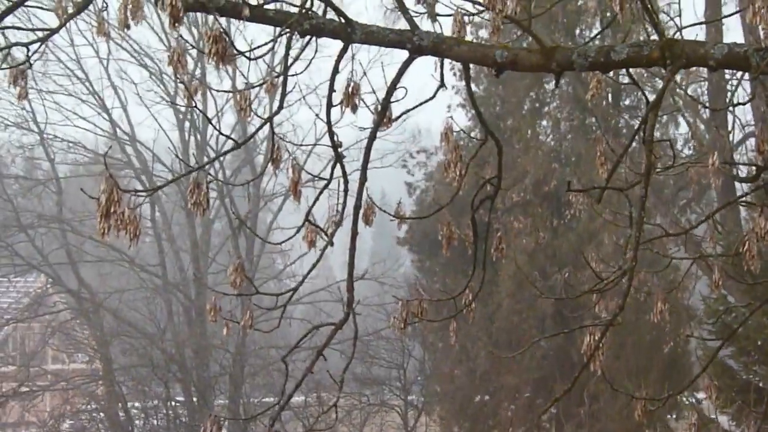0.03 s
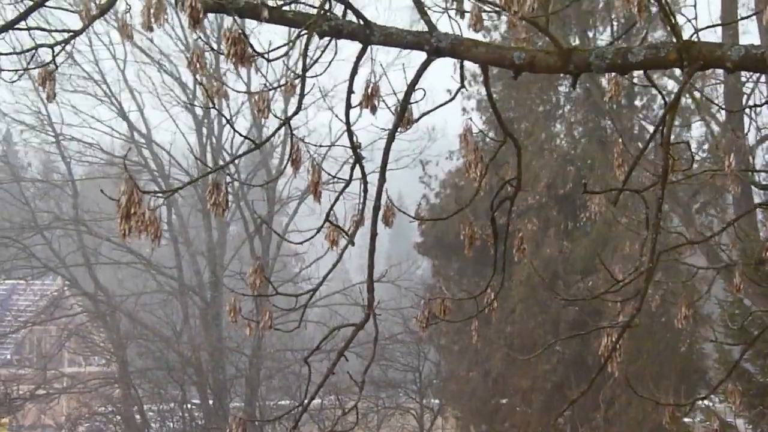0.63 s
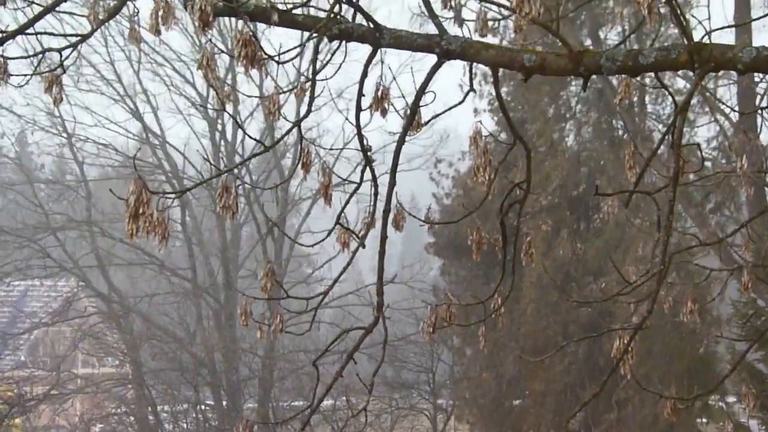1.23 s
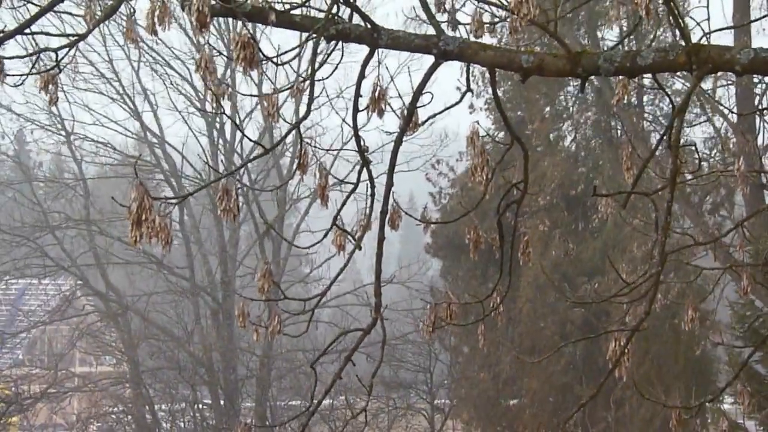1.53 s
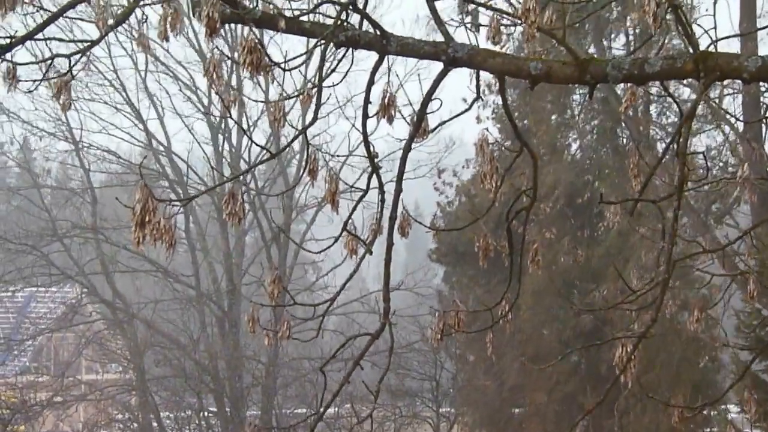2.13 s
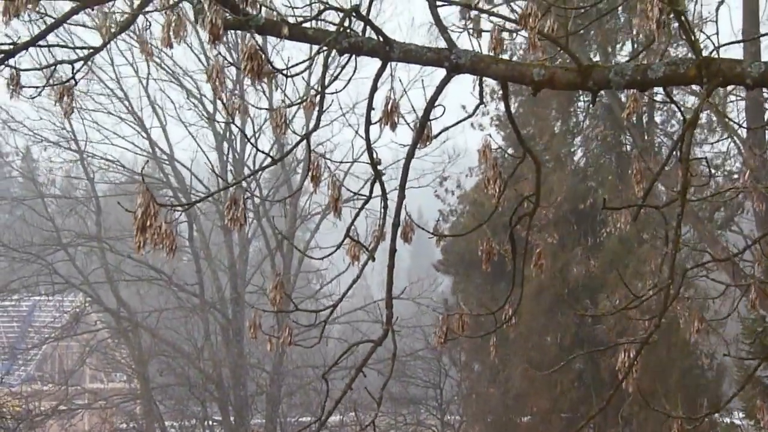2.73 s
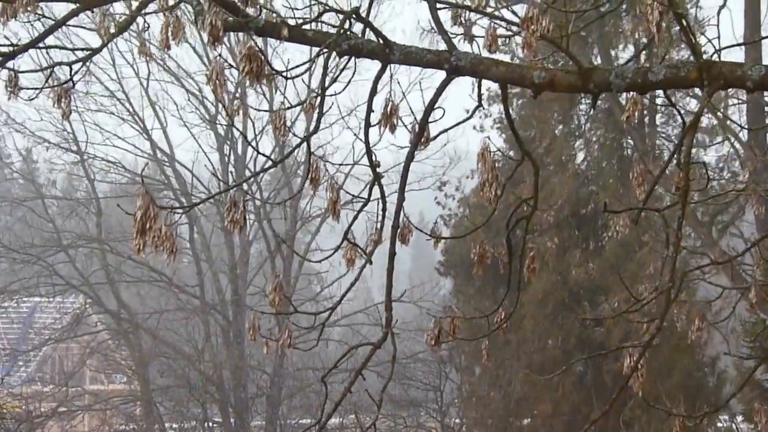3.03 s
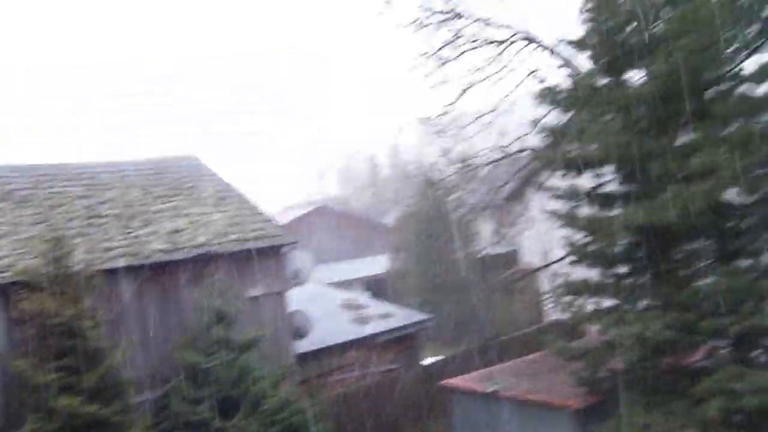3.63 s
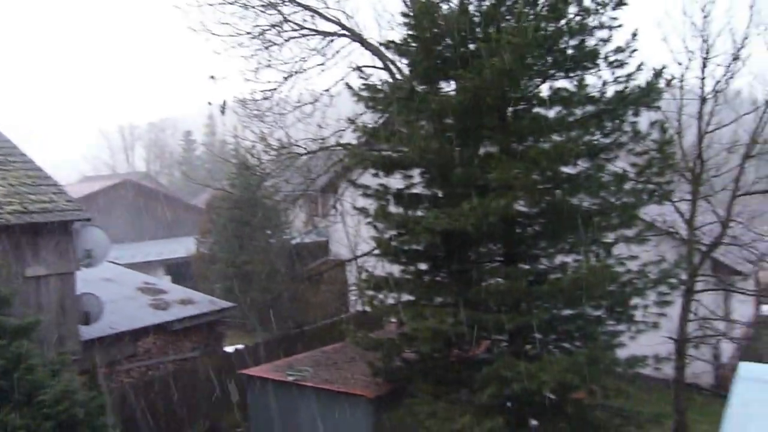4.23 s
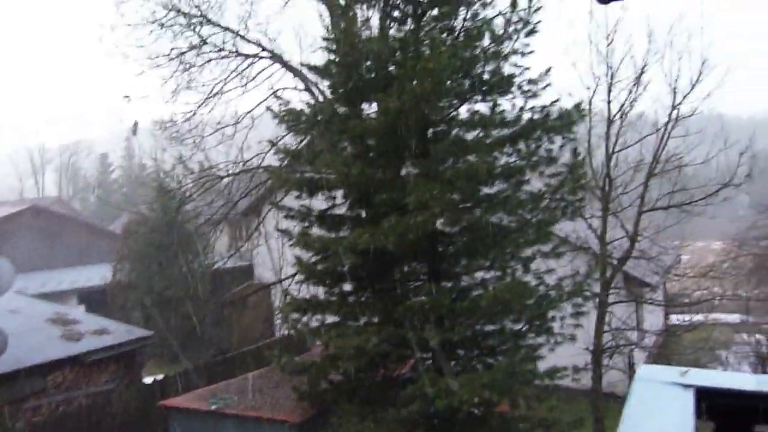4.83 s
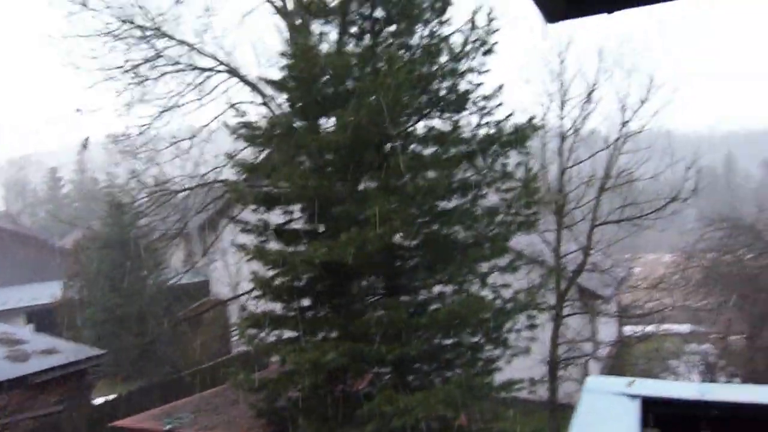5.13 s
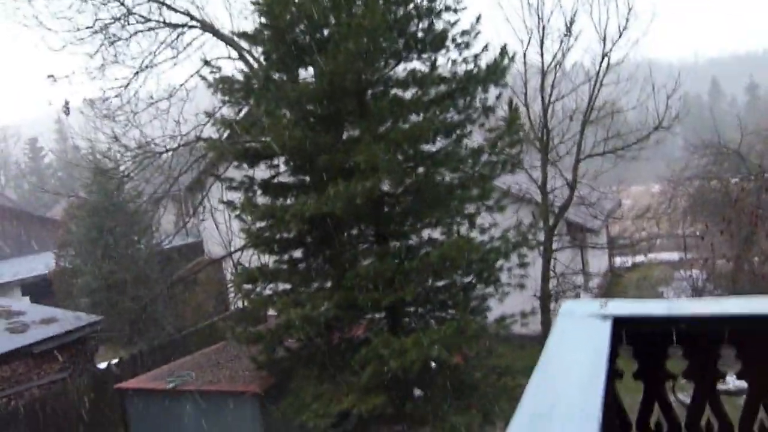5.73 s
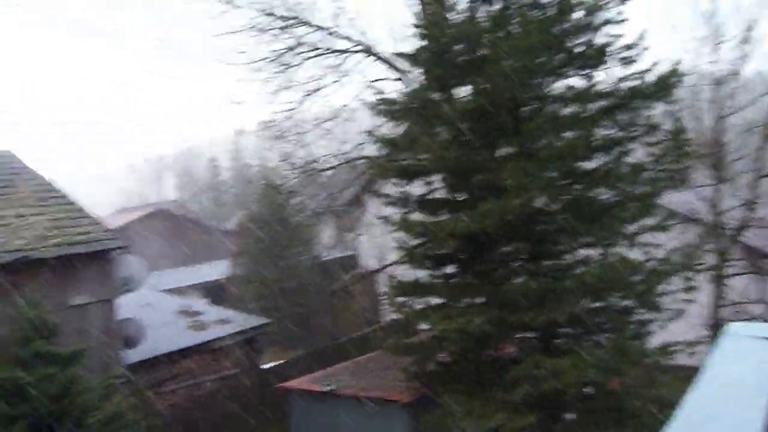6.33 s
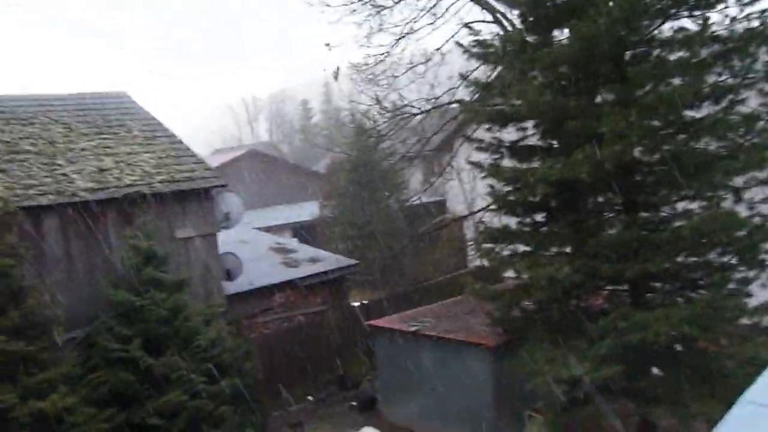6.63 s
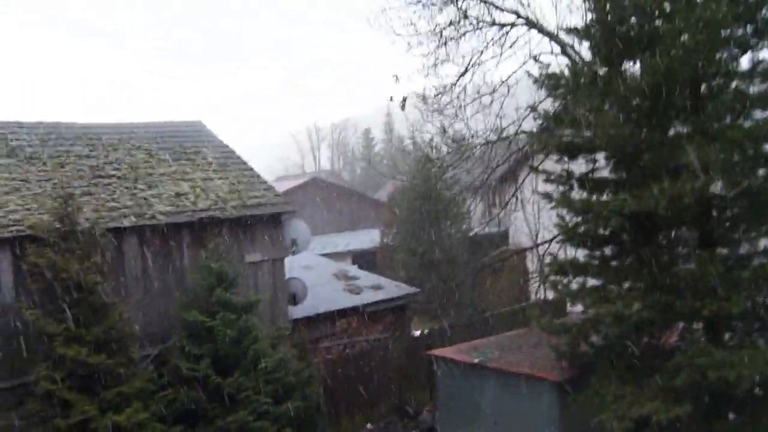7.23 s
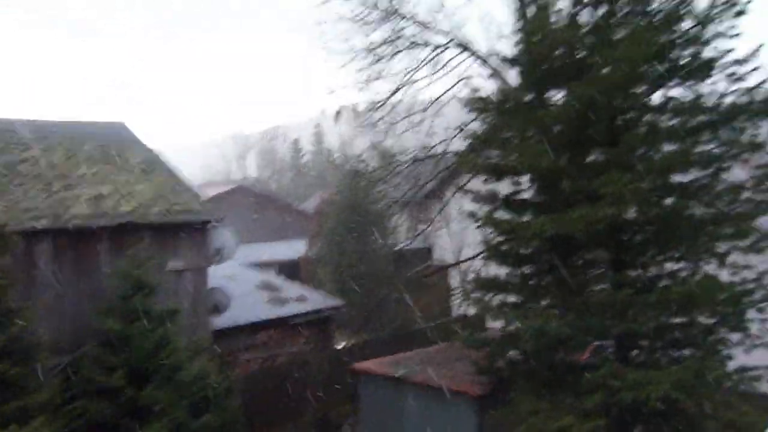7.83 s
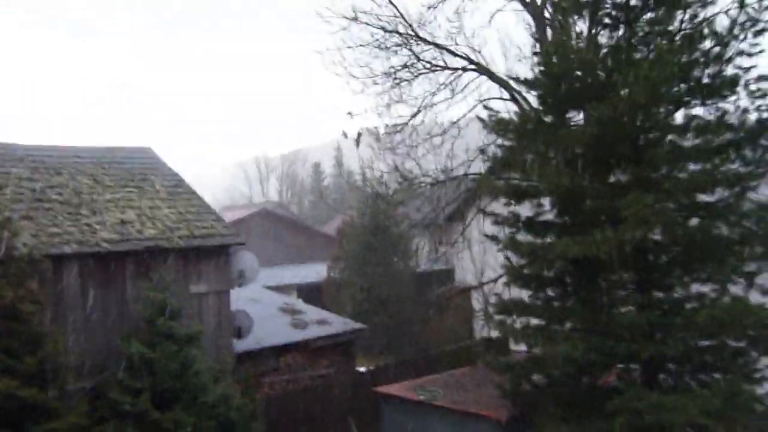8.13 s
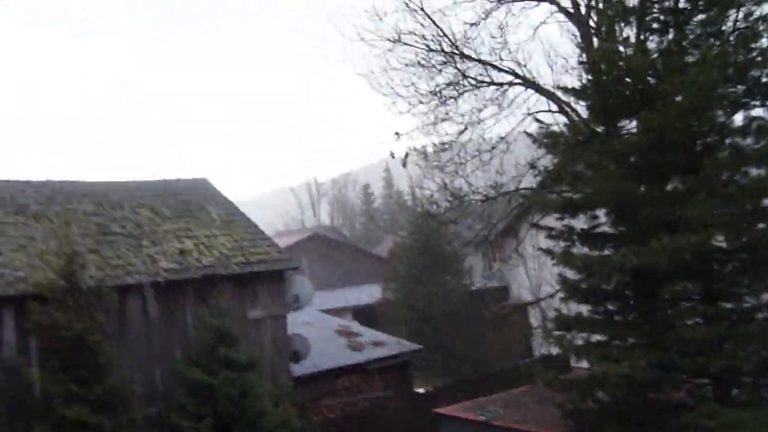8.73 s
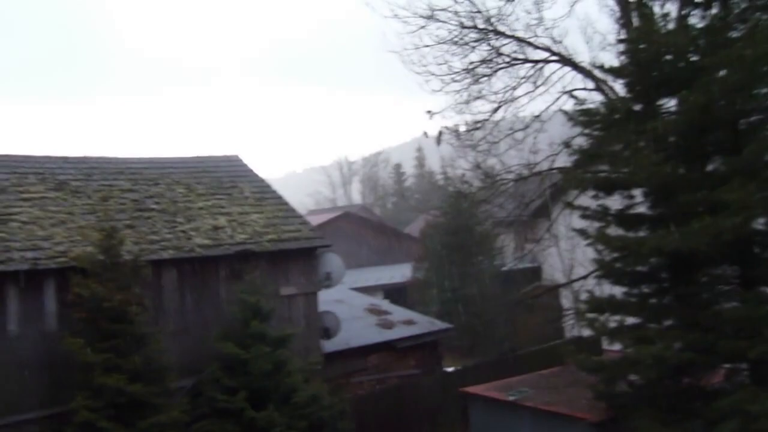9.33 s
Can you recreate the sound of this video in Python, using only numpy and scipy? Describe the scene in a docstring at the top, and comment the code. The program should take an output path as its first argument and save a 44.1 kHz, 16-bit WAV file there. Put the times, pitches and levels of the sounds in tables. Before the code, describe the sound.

In quiet outdoor air, short puffs of wind boom and hiss across the microphone, with faint rustles and a few thin, distant squeaks. Then hail starts abruptly: a steady roar on far roofs and trees under a grainy hiss. Close pellets snap on the boards of a wooden balcony, the railing takes one hard knock and later a soft one, and wind rumbles on the microphone.

```python
"""Wind puffs across the microphone in quiet air, with faint rustles and squeaks; then, abruptly, hail pours.
A winter squall over a village garden, heard from a wooden balcony. Each gust booms low and hisses over an
edge. Fine hail on far roofs and trees merges to a roar under a grainy hiss, and wind rumbles on the
microphone. Near pellets snap on the boards and echo off the walls; the railing rings to a hard knock and
later to a soft one."""
import sys
import numpy as np
from scipy import signal
from scipy.fft import rfft, irfft, next_fast_len
from scipy.io import wavfile
from scipy.ndimage import uniform_filter1d, map_coordinates

SR = 44100
rng = np.random.default_rng(int(sys.argv[2]) if len(sys.argv) > 2 else 0)


def materialize(psi):
    """Save the field psi as 16-bit PCM at rate SR to the path in sys.argv[1].

    A 1-D psi becomes a single channel; in a 2-D psi each row is a channel.
    """
    bounded = np.clip(np.atleast_2d(psi).T, -1, 1)
    quanta = np.round(bounded * 32767).astype(np.int16)
    wavfile.write(sys.argv[1], SR, quanta)


N = 422919
HAIL_START_S = 3.1195

# the squall builds, peaks and eases: t/s, far roar/dB, pellet hiss/dB, spray on the balcony/dB
SQUALL_LEVELS = [(3.12, -39.5, -35, -74), (3.8, -38, -31.5, -53), (4.45, -39, -32, -44.5),
                 (4.8, -39, -32, -37), (5.25, -39, -33.5, -42.5), (5.65, -39.5, -33.5, -46.5),
                 (6.1, -40.5, -35, -41.5), (6.4, -39, -34.5, -42), (6.8, -40.5, -36, -47.5),
                 (7.35, -40.5, -37, -51.5), (7.85, -40.5, -36, -51), (8.35, -40, -39, -58),
                 (8.65, -41, -36.5, -48), (9.0, -39.5, -38, -59), (9.59, -40.5, -36, -59)]
# stereo image of the air and gusts: f/Hz, left-right coherence (1 is mono)
AIR_COHERENCE = [(100, 1), (310, 1), (700, 0.85), (1400, 0.42), (2400, 0.11), (4000, 0.17), (8000, 0.52)]
# stereo image of the hail: f/Hz, left-right coherence
HAIL_COHERENCE = [(50, .35), (110, 1), (180, 1), (380, 0.99), (700, 0.95), (1300, 0.7), (2400, 0.17),
                  (4400, 0.29), (8000, 0.62)]


def amp(db):
    """Decibels to gain."""
    return 10 ** (np.asarray(db) / 20)


def unit(x):
    """Scale to rms 1."""
    return x / np.sqrt(np.mean(x ** 2) + 1e-20)


def along(points, hz):
    """Read a curve of (f/Hz, value) points on a log frequency axis."""
    f, v = np.transpose(points)
    return np.interp(np.log(hz + 1), np.log(f + 1), v)


def curves(rows):
    """One value per sample for each column after the time."""
    times, *columns = np.transpose(rows)
    return [np.interp(np.arange(N) / SR, times, column) for column in columns]


def wobble(rate, count=N):
    """A smooth random curve, rate knots a second."""
    knots = rng.standard_normal(int(count * rate / SR) + 4)
    return map_coordinates(knots, [np.arange(count) * rate / SR])


def swell(start, rise, hold, fall_db_per_s):
    """An envelope with a smooth rise, a hold and up to a second of steady fall."""
    age = np.arange(N) / SR - start
    attack = np.sin(np.pi / 2 * np.clip(age / rise, 0, 1)) ** 2
    return attack * amp(-fall_db_per_s * np.clip(age - rise - hold, 0, 1))


def power_sum(levels):
    """Unrelated sounds add in power."""
    return np.sqrt(sum(level ** 2 for level in levels))


def filtered(x, response):
    """Equalise x with a gain given as a function of frequency."""
    n = x.shape[-1]
    padded = next_fast_len(n + 4096)
    return irfft(rfft(x, padded) * response(np.fft.rfftfreq(padded, 1 / SR)), padded)[..., :n]


def resonances(hz, peaks):
    """Gain of peaks (f/Hz, width/Hz, level/dB) over a flat response."""
    return amp(sum(db / (1 + (2 * (hz - centre) / width) ** 2) for centre, width, db in peaks))


def spread(pair, spectrum, coherence):
    """Colour two unrelated signals with a spectrum (f/Hz, level/dB) and blend them to stereo of rms 1."""
    def mid_side_gains(hz):
        angle = np.arccos(np.clip(along(coherence, hz), -1, 1)) / 2
        return amp(along(spectrum, hz)) * [np.cos(angle), np.sin(angle)]
    mid, side = filtered(pair, mid_side_gains)
    return unit(np.array([mid + side, mid - side]))


def add(track, start, sound):
    """Mix a sound into a track from start seconds on."""
    part = track[..., max(round(start * SR), 0):][..., :sound.shape[-1]]
    part += sound[..., :part.shape[-1]]


def eddies(patchy_db):
    """Two noises whose gain drifts in random patches of time and frequency."""
    bins = signal.stft(rng.standard_normal((2, N)), nperseg=512)[2]
    patches = uniform_filter1d(rng.standard_normal(bins.shape[1:]), size=5, axis=0)
    patches = unit(uniform_filter1d(patches, size=12, axis=1))
    return unit(signal.istft(bins * amp(patchy_db * patches), nperseg=512)[1][:, :N])


def grains(rate, size_db, pitch_hz, cycles, count=30000):
    """Tiny impacts, rate a second, each a damped ring of its own size, pitch and direction."""
    when, where = rng.random((2, count))
    size, pitch = rng.standard_normal((2, count))
    samples = np.arange(64)
    turns = (pitch_hz * np.exp(.35 * pitch))[:, None] * samples / SR
    lands = np.arange(count) < rate * N / SR
    strength = lands * amp(size_db * np.clip(size, -3, 2.6))
    rings = strength[:, None] * np.sin(2 * np.pi * turns) * np.exp(-turns / cycles)
    slots = ((when * N).astype(int)[:, None] + samples).ravel()
    pans = np.cos(2 * np.pi * where), np.sin(2 * np.pi * where)
    return unit(np.array([np.bincount(slots, (rings * pan[:, None]).ravel(), N)[:N] for pan in pans]))


def ping(t, hz, length, phase):
    """A few cycles that swell and die around t = 0."""
    return np.exp(-(t / length) ** 2) * np.sin(2 * np.pi * (hz * t + phase))


def calm():
    """A bed of quiet outdoor air, a faint hiss dying away and brief rustles, each at its own pitch."""
    # tone of the still air and of the rustling: f/Hz, level/dB
    air_spectrum = [(25, -27), (60, -26), (95, -4.5), (120, -8), (155, -3), (183, 0), (212, -5.5),
                    (250, -3.5), (277, 1.5), (305, -5.5), (400, -6), (520, -9.5), (900, -13), (1310, -15),
                    (1360, -19), (1420, -16.5), (2400, -20), (3400, -18), (5000, -23.5), (7700, -30)]
    rustle_spectrum = [(500, -18), (1700, 2), (3500, -1), (5200, -7), (6500, -6.5), (7700, -25)]
    # rustle cues: t/s, level/dB, f/Hz
    rustles = [(0.885, -57.5, 5000), (1.18, -64, 5500), (2.24, -51.5, 4830), (2.41, -59.5, 5400),
               (2.64, -61, 6400), (2.785, -65, 2500), (2.865, -63.5, 5850), (2.98, -66, 5000)]
    out = amp(-55) * spread(eddies(patchy_db=0.9), air_spectrum, AIR_COHERENCE)
    fade = amp(-54.5 - 23 * np.arange(N) / SR)
    out += fade * spread(eddies(patchy_db=3.7), rustle_spectrum, AIR_COHERENCE)
    n, width_hz, peak_db = SR // 2, 2000, 11.5
    for start, db, hz in rustles:
        scuff = filtered(rng.standard_normal((2, n)), lambda f: resonances(f, [(hz, width_hz, peak_db)]))
        level = amp(db) * swell(0, rise=0.015, hold=0.013, fall_db_per_s=107)[:n]
        add(out, start, level * spread(scuff, rustle_spectrum, AIR_COHERENCE))
    return out


def squeaks():
    """A few thin, rough, wavering tones, faint and far off."""
    # squeak cues: t/s, f/Hz, level/dB, hold/s
    cues = [(2.589, 1680, -62.5, .028), (2.583, 2370, -66, .055), (2.65, 3330, -64, .04),
            (2.655, 4400, -68, .015), (2.698, 2150, -63, .03), (2.702, 1310, -62, .025),
            (2.76, 1294, -61.5, .025), (2.803, 2070, -70, 0.054)]
    waver, rough_db = .027, 3.5
    out, n = np.zeros(N), SR // 3
    for start, hz, db, hold in cues:
        phase = 2 * np.pi * np.cumsum(hz * (1 + waver * wobble(195, n))) / SR
        envelope = swell(0, rise=0.013, hold=hold, fall_db_per_s=380)[:n]
        add(out, start, amp(db + rough_db * wobble(123, n)) * envelope * np.sin(phase))
    return out


def gusts():
    """Each puff booms, rushes and hisses over an edge, higher as it gathers speed; the boom lasts longest."""
    # puffs of wind: t/s, rise/s, hold/s, boom/dB, rush/dB, hiss/dB, boom pitch/Hz,
    # edge tone at the start/Hz, edge tone at full strength/Hz, edge tone against the hiss/dB
    puffs = [(0.045, 0.089, 0.025, -42.5, -39.5, -37, 153, 2590, 4650, -8.5),
             (0.17, 0.0303, 0.083, -45, -42, -55, 153, 1500, 2000, 3),
             (0.726, 0.017, .02, -61, -57, -78, 130, 4200, 4200, -8),
             (1.071, 0.02, 0.021, -50, -51.5, -53, 190, 1440, 1597, 5),
             (1.742, 0.024, 0.04, -52, -50, -57, 200, 1530, 1820, -2),
             (1.937, 0.022, 0.15, -47, -53.5, -58.5, 191, 4000, 5020, -11),
             (2.069, 0.034, 0.043, -46, -50, -54, 181, 2410, 3160, -12),
             (2.187, 0.018, 0.089, -40.5, -43, -54.5, 190, 3490, 5340, -9),
             (2.313, 0.046, 0.059, -44, -44.5, -59, 204, 4500, 5450, -11)]
    # tone of the hollow boom, the midrange rush and the airy hiss: f/Hz, level/dB
    boom_spectrum = [(30, -46), (55, -38), (85, -13), (130, -1), (190, -2.5), (250, -2.5), (330, -10),
                     (500, -29), (1000, -68)]
    rush_spectrum = [(200, -26), (360, -5), (450, 2), (620, -3.5), (770, -8), (1000, -8), (1250, -7.5),
                     (1500, -11.5), (1750, -8), (2050, -20), (3300, -25), (7000, -29.5)]
    hiss_spectrum = [(1000, -8), (1750, 1.5), (2500, 4), (3500, -3), (4400, -1), (5400, -6), (6400, -8),
                     (7700, -18)]
    # narrow resonances that colour every gust: f/Hz, width/Hz, level/dB
    cavities = [(190, 34, 6.5), (273, 30, 1.5), (385, 30, -1), (474, 30, 1), (488, 25, 0), (585, 46, 6),
                (954, 35, 5.5), (1160, 75, 5), (1390, 33, 8.5), (1675, 44, 5), (3150, 59, 5)]
    boom_root_hz, edge_width_hz, hiss_lag_s, flutter_db = 190, 780, 0.0059, 0.9
    out, t = np.zeros((2, N)), np.arange(SR) / SR
    rush_levels = []
    for start, rise, hold, boom_db, rush_db, hiss_db, boom_hz, first_hz, full_hz, edge_db in puffs:
        transposed = [(f * boom_hz / boom_root_hz, db) for f, db in boom_spectrum]
        boom = spread(rng.standard_normal((2, SR)), transposed, AIR_COHERENCE)
        glide_hz = np.interp(t, [0, rise + hold], [first_hz, full_hz])
        band = filtered(rng.standard_normal((2, SR)), lambda f: 1 / (1 + (2 * f / edge_width_hz) ** 2))
        edge = unit(band * np.sin(2 * np.pi * np.cumsum(glide_hz) / SR))
        air = spread(rng.standard_normal((2, SR)), hiss_spectrum, AIR_COHERENCE)
        hiss = unit(air + amp(edge_db) * edge)
        boom_level = amp(boom_db) * swell(0, rise, hold, fall_db_per_s=69)[:SR]
        hiss_level = amp(hiss_db) * swell(hiss_lag_s, rise, hold, fall_db_per_s=121)[:SR]
        add(out, start, boom_level * boom + hiss_level * hiss)
        rush_levels.append(amp(rush_db) * swell(start, rise, hold, fall_db_per_s=112))
    out += power_sum(rush_levels) * spread(eddies(patchy_db=0.58), rush_spectrum, AIR_COHERENCE)
    return amp(flutter_db * wobble(90) - 2.5) * filtered(out, lambda hz: resonances(hz, cavities))


def thumps():
    """A lump of air hits the microphone housing, which answers with a few low cycles."""
    # soft wind thumps: t/s, level/dB, f/Hz, rise/s
    cues = [(0.117, -26.5, 154, 0.011), (0.142, -29.5, 199, 0.008), (0.159, -34, 195, 0.022),
            (1.094, -48.5, 370, 0.016), (1.1, -44.5, 192, 0.025), (1.8, -44, 220, 0.014),
            (2.098, -35.5, 197, 0.016), (5.944, -38, 197, .012), (6.128, -40, 61.5, 0.019),
            (6.998, -38.5, 353, 0.013), (7.01, -37.5, 264, 0.019), (7.295, -39, 86, 0.021),
            (7.842, -37, 147, 0.012)]
    out, t = np.zeros(N), np.arange(SR // 4) / SR
    for start, db, hz, rise in cues:
        envelope = (t / rise * np.exp(1 - t / rise)) ** 2
        add(out, start, amp(db) * envelope * np.sin(2 * np.pi * (hz * t + rng.random())))
    return out


def buffet():
    """A restless breeze rumbles on the microphone ports, with harder pushes now and then."""
    # pushes of wind: t/s, hold/s, level/dB
    cues = [(4.888, 0.028, -56), (5.167, 0.095, -52), (5.394, 0.04, -54), (5.66, 0.2, -56),
            (5.9, 0.36, -45.5), (6.392, 0.14, -46.5), (6.837, 0.15, -48.5), (7.172, 0.018, -42),
            (7.272, 0.084, -47), (8.497, 0.033, -48), (9.23, .02, -52), (9.544, .04, -48)]
    # tone of the rumble: f/Hz, level/dB
    spectrum = [(15, -10), (35, -5.5), (70, 1), (105, -6), (160, -13.5), (400, -39.5), (1000, -82)]
    # likeness of the two ports: f/Hz, coherence
    coherence = [(40, .2), (100, 0.91), (200, .7)]
    pushes = [amp(db) * swell(start, rise=0.031, hold=hold, fall_db_per_s=158.5)
              for start, hold, db in cues]
    breeze = amp(-59.5 + 1.4 * wobble(3.0))
    return power_sum(pushes + [breeze]) * spread(eddies(patchy_db=0.63), spectrum, coherence)


def hail():
    """Hail on far roofs and trees merges to a roar; nearer pellets make a grainy hiss in waves."""
    # tone of the far roar and of the nearer patter: f/Hz, level/dB
    roar_spectrum = [(40, -31), (110, -6), (160, -2), (280, -1), (350, -1.5), (410, -4.5), (520, -3),
                     (750, -3.5), (1150, -6.5), (2000, -12.5), (4000, -12), (7700, -31)]
    patter_spectrum = [(200, -19.5), (700, -7), (1300, -2), (2200, -1.5), (3500, -1), (5500, 4), (6600, 2),
                       (7700, -1.5)]
    roar_db, hiss_db, _ = curves(SQUALL_LEVELS)
    roar_level = amp(roar_db + 0.22 * wobble(9.2))
    roar = spread(eddies(patchy_db=0.77), roar_spectrum, HAIL_COHERENCE)
    fine = eddies(patchy_db=2.2) + 0.43 * grains(rate=2400, size_db=0.0, pitch_hz=3200, cycles=0.63)
    coarse = grains(rate=260, size_db=3.5, pitch_hz=3980, cycles=2.7)
    hiss = spread(unit(fine) + 0.23 * coarse, patter_spectrum, HAIL_COHERENCE)
    return roar_level * roar + amp(hiss_db + 0.25 * wobble(16)) * hiss


def spray():
    """Small pellets, and a few bigger ones, tick on the boards in wind-blown waves."""
    small = grains(rate=350, size_db=2.5, pitch_hz=3570, cycles=5.1)
    big = grains(rate=41, size_db=1.0, pitch_hz=3600, cycles=2.2)
    spectrum = [(1500, -14.5), (3000, -3.0), (5000, -1.5), (7500, -7.0)]
    _, _, spray_db = curves(SQUALL_LEVELS)
    return amp(spray_db) * spread(small + 0.49 * big, spectrum, HAIL_COHERENCE)


def flurries():
    """A gust throws a handful of pellets at the wall: a quick swell of hiss."""
    # handfuls: t/s, level/dB, rise/s
    cues = [(4.963, -40, 0.012), (6.264, -48, 0.097), (8.031, -34, 0.031), (8.576, -41.5, 0.024)]
    level, t = np.zeros(N), np.arange(SR // 2) / SR
    for start, db, rise in cues:
        add(level, start, amp(db) * t / rise * np.exp(1 - t / rise))
    ticks = grains(rate=4100, size_db=3.5, pitch_hz=5170, cycles=2.5)
    spectrum = [(1500, -17), (3500, -7), (5200, -1.5), (6500, -2.5), (7500, -16)]
    return level * spread(ticks, spectrum, HAIL_COHERENCE)


def knocks():
    """A blow rings the railing, which lifts and lands again; a soft blow barely stirs the high modes."""
    # blows: t/s, level/dB, hardness as low-pass cutoff/Hz
    blows = [(5.4211, -27, 7040), (7.85, -38, 1500)]
    # railing modes: f/Hz, level/dB, t60/s
    modes = [(175, -23, .1), (335, -7.5, 0.15), (381, -8.5, .1), (800, -1, 0.031), (907, 4.5, 0.035),
             (1040, -7, 0.023), (1213, 4, 0.079), (1400, -5, 0.028), (1710, -15, 0.027), (2080, -3, 0.04),
             (2430, -3, .05), (2830, -7, .04), (4250, -1, .04), (4540, 4, 0.045), (4730, 1, .035)]
    rebound_s, rebound_db, attack_s, crack_t60_s = .0045, 0.5, 0.00077, 0.11
    out, t = np.zeros((2, N)), np.arange(SR // 4) / SR
    for start, db, cutoff_hz in blows:
        for delay, extra_db in [(0, 0), (rebound_s, rebound_db)]:
            ring = np.zeros((2, len(t)))
            for hz, mode_db, t60 in modes:
                phase = rng.random() + 0.42 * rng.random((2, 1))  # a little apart in left and right
                ring += amp(mode_db - 60 * t / t60) * np.sin(2 * np.pi * (hz * t + phase))
            crack = 1.2 * amp(-60 * t / crack_t60_s) * rng.standard_normal((2, len(t)))
            blow = amp(db + extra_db) * (1 - np.exp(-t / attack_s)) * (ring + crack)
            add(out, start + delay, filtered(blow, lambda f: 1 / np.sqrt(1 + (f / cutoff_hz) ** 4)))
    return out


def snap(t, snap_hz, ring_hz, decay_s):
    """A pellet cracks on contact at t = 0 and rings its spot at two pitches for a few cycles."""
    rise_s = .00022
    age = np.maximum(t, 0)
    attack = 1 - np.exp(-(age / rise_s) ** 2)
    body = np.exp(-age / (.75 * decay_s)) * np.sin(2 * np.pi * snap_hz * age)
    ring = amp(-15.5) * np.exp(-age / decay_s) * np.sin(2 * np.pi * ring_hz * age)
    crack = amp(-8) * ping(t - rise_s, hz=5200, length=.00022, phase=0)
    return attack * (body + ring) + crack


def balcony_echo(t, wall_s, snap_hz, ring_hz):
    """The wall throws back a blurred ping; a faint ring and scattered sound build up and die away."""
    build_s, ring_t60_s, scatter_t60_s = 0.0019, 0.084, 0.086
    age = np.maximum(t, 0)
    wall = np.array([ping(t - wall_s, ring_hz, length=0.0011, phase=rng.random()) for _ in range(2)])
    phase = 0.51 * rng.random((2, 1))
    ring = amp(-1.5 - 60 * age / ring_t60_s) * np.sin(2 * np.pi * (ring_hz * t + phase))
    centre = np.sqrt(snap_hz * ring_hz)
    spectrum = [(centre / 3, -32), (centre / 2, -10), (centre, 0), (centre * 1.9, -6), (centre * 4.1, -16)]
    noise = rng.standard_normal(len(t)) + 0.68 * rng.standard_normal((2, len(t)))
    scatter = amp(4 - 60 * age / scatter_t60_s) * unit(filtered(noise, lambda f: amp(along(spectrum, f))))
    return amp(1) * wall + (1 - np.exp(-age / build_s)) * (ring + scatter)


def pellets():
    """Each near pellet snaps on the balcony; the floor repeats it at once, the wall a moment later."""
    # close hits: t/s, level/dB, snap pitch/Hz, decay/s, left over right/dB, echo/dB, struck spot's ring/Hz
    hits = [(3.735, -18, 5300, 0.0011, 14, -29, 4330), (3.795, -16.5, 2270, 0.0019, -13.0, -33.5, 3600),
            (3.8835, -15, 3040.0, 0.00065, -14, -36, 4600), (3.925, -17.5, 2780, 0.001, 17.0, -48, 5230.0),
            (3.999, -24.5, 2460, 0.0014, -5, -31.5, 2270), (4.218, -21, 5460, 0.00094, 7, -29.5, 5860),
            (4.26, -26, 3080.0, 0.00062, -2, -30, 2240), (4.3444, -22, 2330.0, 0.0017, -9, -34, 2380),
            (4.499, -14, 3400, 0.00077, -16.0, -30, 3040), (4.694, -25, 4500, 0.0012, -2, -40, 4500),
            (4.7152, -9, 3730.0, 0.0011, -7, -26, 3770), (4.751, -21, 5340.0, 0.0007, -7.0, -41, 4740.0),
            (4.8034, -16, 2580.0, 0.00083, 6, -35, 4730), (4.811, -20, 4650, 0.0014, 2, -36, 4600),
            (4.822, -23, 3720, 0.0006, -3.0, -35, 5490.0), (4.898, -15, 3770, 0.001, -11, -32.5, 3370),
            (4.935, -18, 3210.0, 0.0006, -6, -36, 3640.0), (4.998, -17, 3800, 0.0008, -7.0, -31, 3870),
            (5.05, -22, 2650, 0.001, 3.0, -41, 2510), (5.0788, -15.5, 3600, 0.0012, 13, -29, 5000),
            (5.115, -22, 4350.0, 0.00097, -3, -36, 3810.0), (5.199, -24, 3100, 0.0012, -5, -41, 3200),
            (5.222, -19, 4240.0, 0.0006, -4, -38, 5400), (5.251, -16, 4240.0, 0.0007, -4, -33, 3850.0),
            (5.266, -11.5, 3800, 0.0007, -3.0, -29, 5560.0), (5.32, -14.5, 4970, 0.0006, 4, -29, 5400),
            (5.353, -15.5, 2650.0, 0.00084, 24, -37, 2500.0), (5.6488, -11.5, 3770, 0.00088, -1, -35, 2980),
            (5.66, -21, 3900, 0.0007, 8, -36, 4800), (5.7023, -10, 3720, 0.0006, -5.0, -34, 5500),
            (5.782, -21, 3900, 0.0006, 0, -38, 3500), (5.8585, -17.5, 2700, 0.0013, 12, -37, 4840.0),
            (5.8642, -21.5, 4900, .0009, 7, -38, 4840), (5.931, -26, 4370.0, 0.001, -2.0, -41, 4200),
            (5.943, -17, 4040, 0.00062, -5.0, -43, 4870.0),
            (5.966, -24.0, 4440.0, 0.0009, 1.0, -37, 3550.0), (6, -18, 4520.0, 0.00036, -1, -36, 5500),
            (6.0659, -16, 3760, 0.00085, 3, -41, 2970), (6.08, -19.0, 4720.0, 0.0007, -1.0, -32.5, 4200),
            (6.093, -26, 4130.0, 0.0011, -7, -44, 3100), (6.096, -27, 3150, 0.0011, 0, -41, 5000),
            (6.104, -20, 6250, 0.00047, -4.0, -34, 4800), (6.165, -19, 3490.0, 0.00055, -3, -39, 4780.0),
            (6.184, -22, 3900, 0.001, 0, -39, 3300), (6.27, -22, 2700, 0.0011, 13.0, -38, 4570.0),
            (6.289, -17, 3800, 0.00083, 0, -36, 5400), (6.2923, -19, 3300, 0.0018, -2.0, -35, 3640),
            (6.326, -19, 3320, 0.001, -1.0, -33, 5900), (6.378, -26, 3550.0, 0.0012, -4.0, -33.5, 3600),
            (6.413, -23, 4630.0, 0.0007, 1.0, -43, 4900), (6.428, -27, 3400, 0.0012, -2, -41, 3400),
            (6.4885, -27, 5880.0, 0.00075, 3, -39, 6140.0), (6.542, -25, 4480.0, 0.0006, -4, -40, 4530),
            (6.637, -19.5, 2800, 0.0009, 3.0, -40, 3260), (6.652, -25, 4370.0, 0.0006, -5.0, -39, 4630.0),
            (6.827, -22, 3020, 0.0011, -15.0, -36.5, 2860), (7.7355, -27, 4410.0, 0.0007, -9.0, -35, 4380),
            (7.8287, -16, 4500, 0.00034, -5, -34.5, 2730), (8.052, -18, 5200, 0.00059, 21, -38, 4240.0),
            (8.368, -24, 5210.0, 0.0007, -14, -42, 3460), (8.38, -23, 3510.0, 0.001, -9.0, -45, 2580.0),
            (8.5444, -21.5, 5230, 0.00062, -17.0, -39, 4910.0),
            (8.611, -19, 3080.0, 0.0005, -5.0, -38, 2260), (8.6904, -18, 4330, 0.00053, -12, -36, 4570),
            (8.814, -16, 3800, 0.0005, -8, -35, 2670.0), (8.822, -25, 5500, .0008, 7, -41, 5600),
            (9.114, -29, 5500, 0.0015, 0, -41, 5560), (9.18, -32, 5040.0, 0.0009, -3.0, -35.5, 5620),
            (9.305, -25, 3700, 0.0005, 0, -44, 5000), (9.491, -25, 4030.0, 0.0005, -10, -37, 2360)]
    floor_delay_s, floor_db, wall_delay_s, path_scatter = 0.00116, -14.5, 0.0062, .08
    lead_s = .003  # room for the swell ahead of the crack
    out, t = np.zeros((2, N)), np.arange(SR // 8) / SR - lead_s
    for start, db, snap_hz, decay_s, pan_db, echo_db, ring_hz in hits:
        path_stretch = 1 + path_scatter * rng.standard_normal(2)
        floor_s, wall_s = path_stretch * [floor_delay_s, wall_delay_s]
        pan = unit(amp(np.array([[pan_db], [-pan_db]]) / 2))
        direct = snap(t, snap_hz, ring_hz, decay_s)
        floor = amp(floor_db) * snap(t - floor_s, snap_hz, ring_hz, decay_s)
        echo = amp(echo_db) * balcony_echo(t, wall_s, snap_hz, ring_hz)
        add(out, start - lead_s, amp(db + 2.5) * pan * (direct + floor) + echo)
    return out


def scene():
    """The quiet spell gives way to the hail in an instant; wind thumps run through both."""
    # the squall's treble leans to the left: f/Hz, left over right/dB
    lean = [(60, -1), (350, -0.5), (2500, 1.8)]
    weather = hail() + spray() + buffet() + flurries()
    weather = filtered(weather, lambda hz: amp(np.outer([1, -1], along(lean, hz)) / 2))
    hailing = np.arange(N) / SR >= HAIL_START_S
    return thumps() + np.where(hailing, weather + pellets() + knocks(), calm() + gusts() + squeaks())


def record(dry):
    """The treble rolls off to a very faint top hiss, then cuts off steeply."""
    # f/Hz, level/dB
    rolloff = [(6500, 1), (7150, -1.5), (7550, -5), (7750, -11), (7950, -21), (8700, -24)]
    top_hz = 8800
    return filtered(dry, lambda hz: amp(along(rolloff, hz)) / np.sqrt(1 + (hz / top_hz) ** 160))


dry = scene()
out = record(dry)
materialize(out)
```